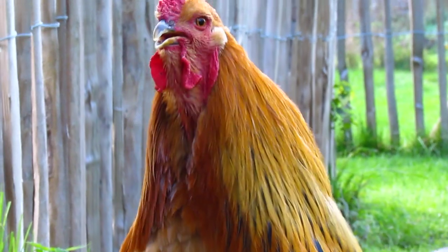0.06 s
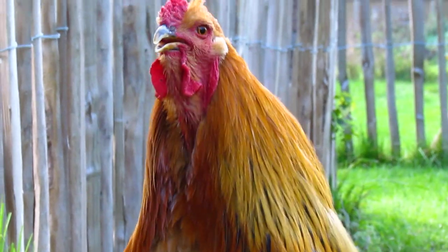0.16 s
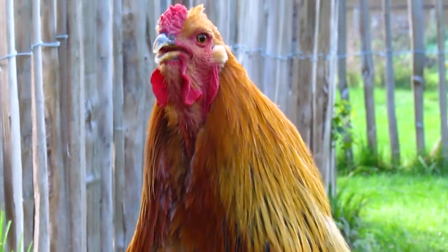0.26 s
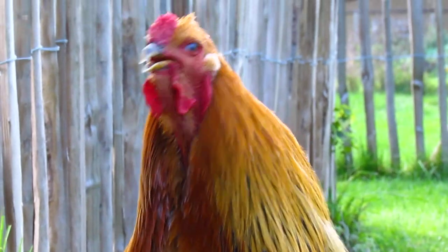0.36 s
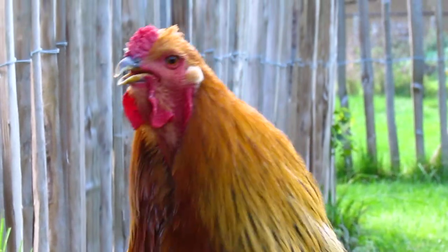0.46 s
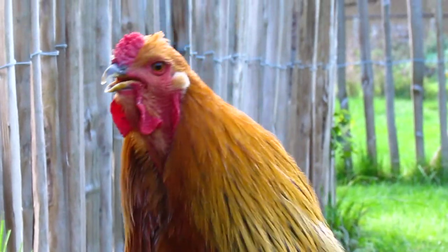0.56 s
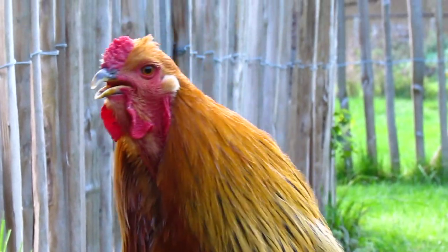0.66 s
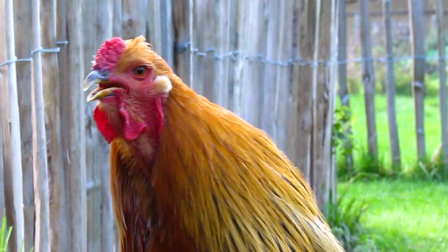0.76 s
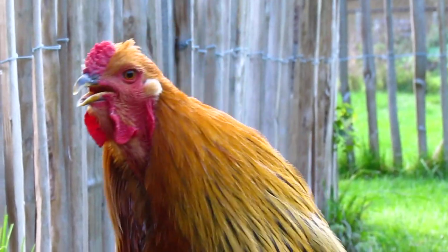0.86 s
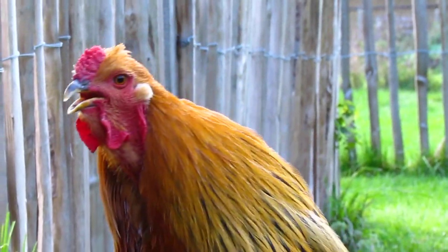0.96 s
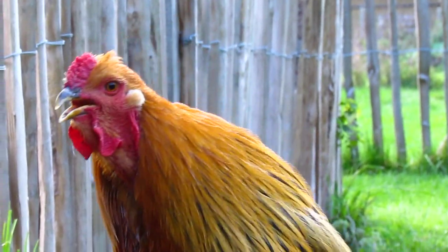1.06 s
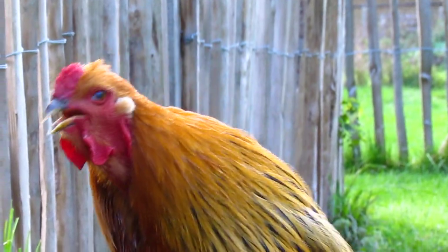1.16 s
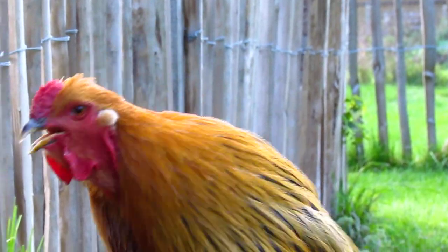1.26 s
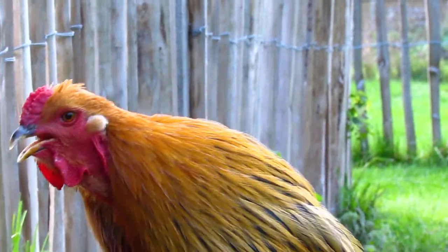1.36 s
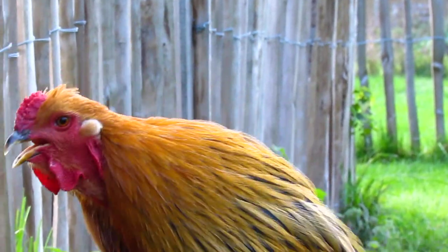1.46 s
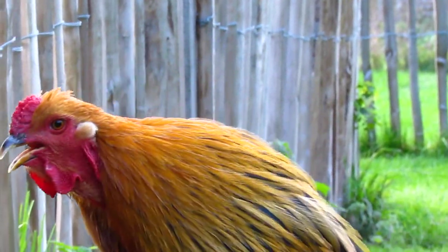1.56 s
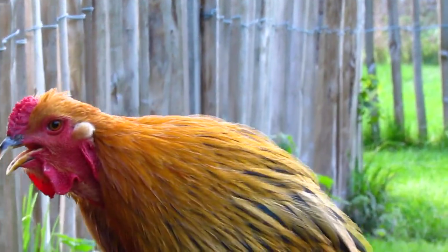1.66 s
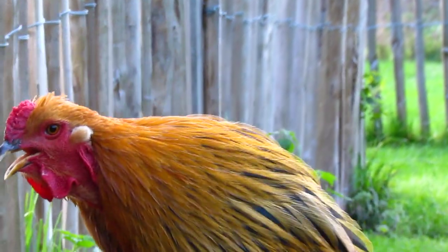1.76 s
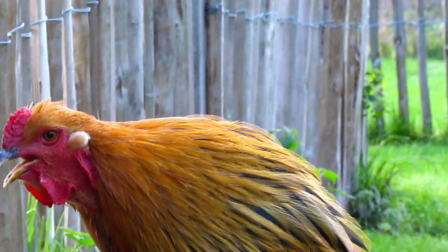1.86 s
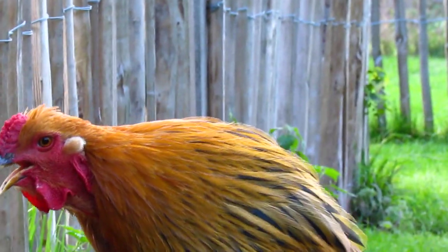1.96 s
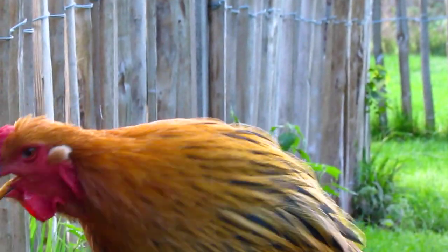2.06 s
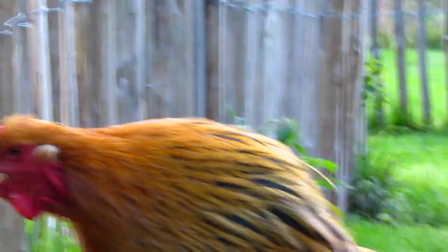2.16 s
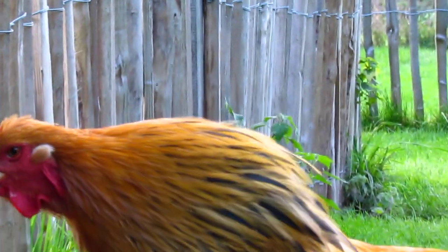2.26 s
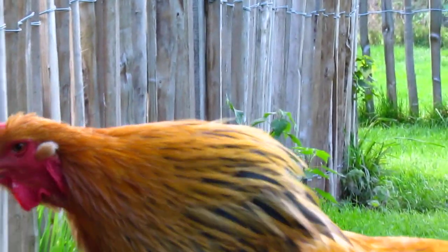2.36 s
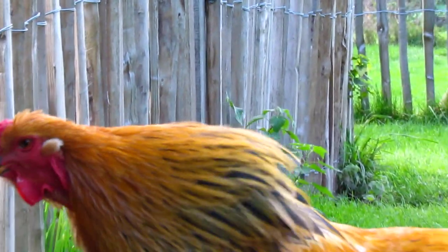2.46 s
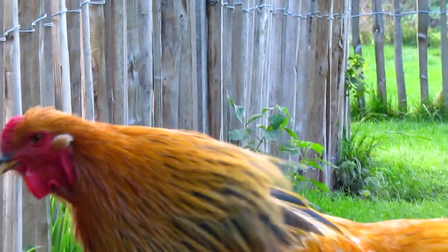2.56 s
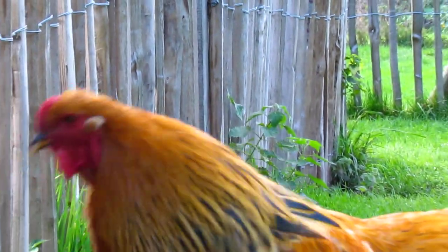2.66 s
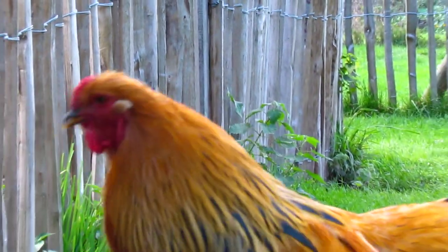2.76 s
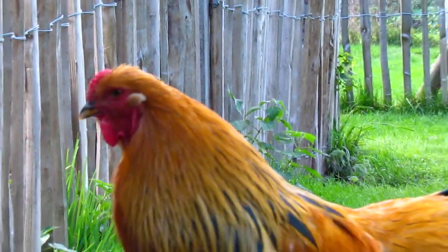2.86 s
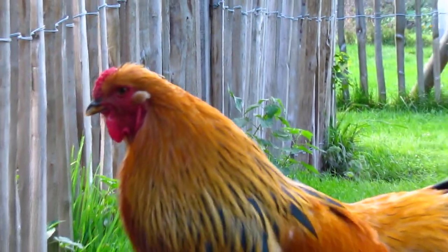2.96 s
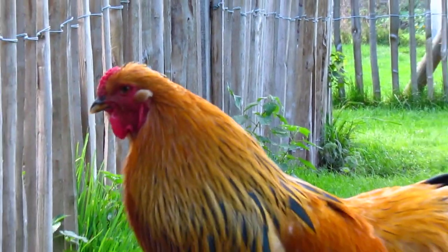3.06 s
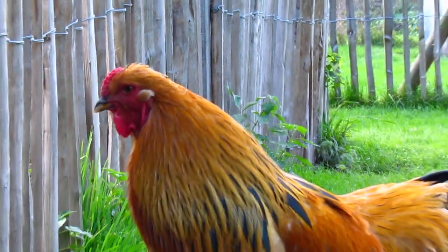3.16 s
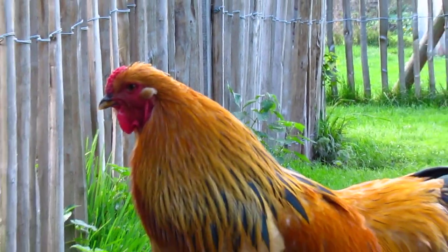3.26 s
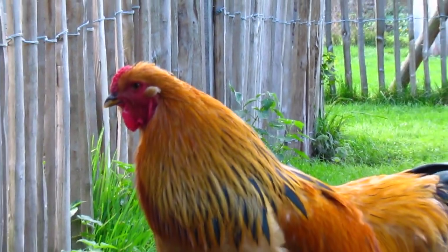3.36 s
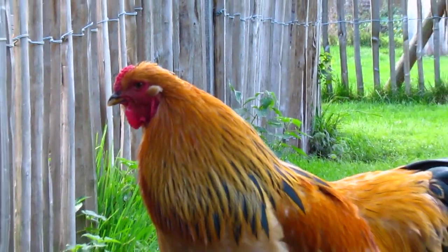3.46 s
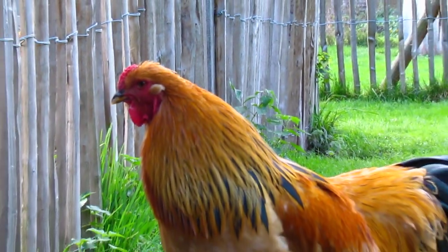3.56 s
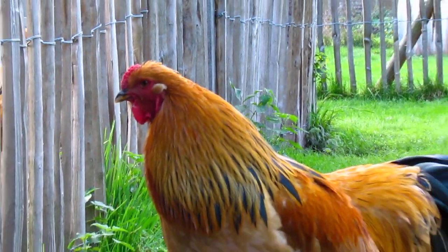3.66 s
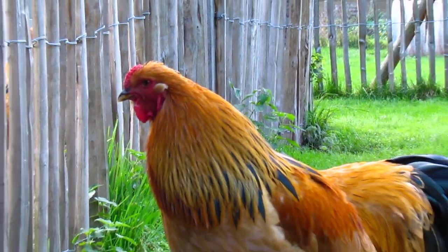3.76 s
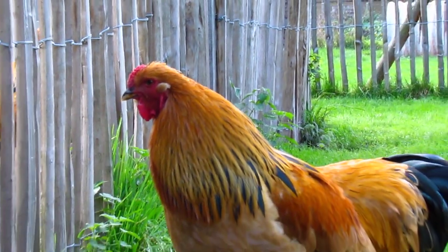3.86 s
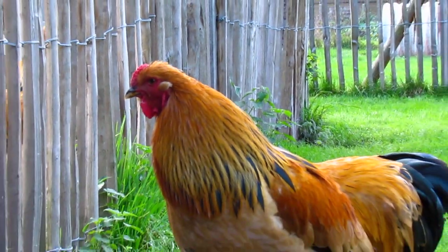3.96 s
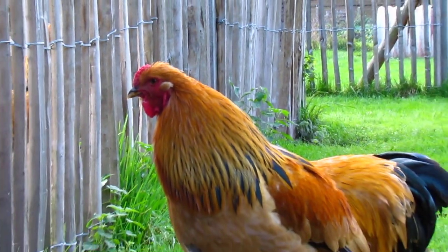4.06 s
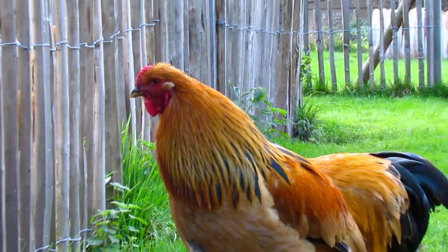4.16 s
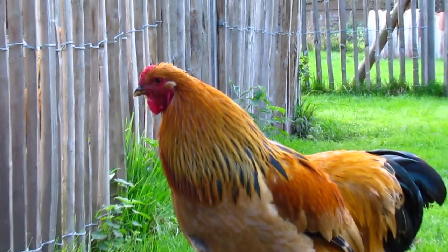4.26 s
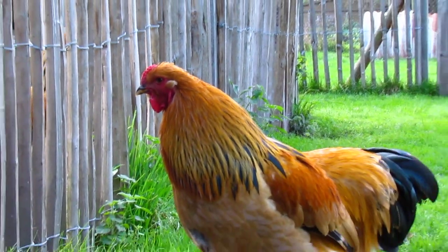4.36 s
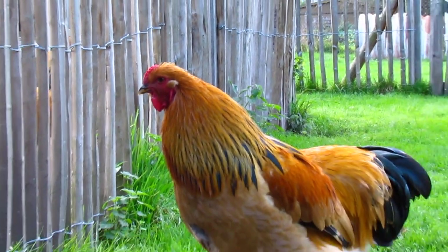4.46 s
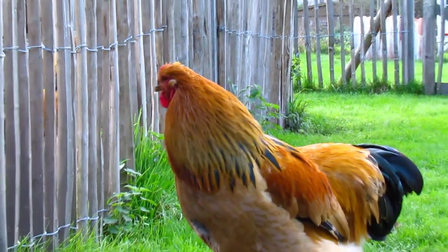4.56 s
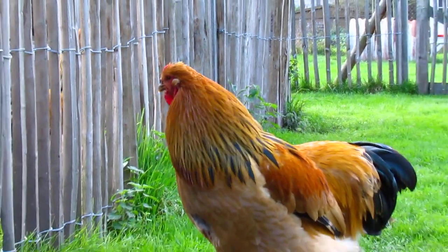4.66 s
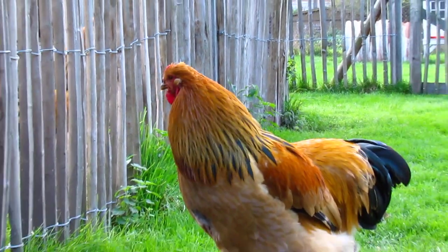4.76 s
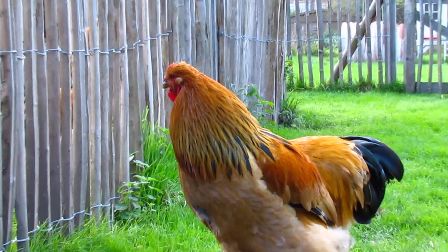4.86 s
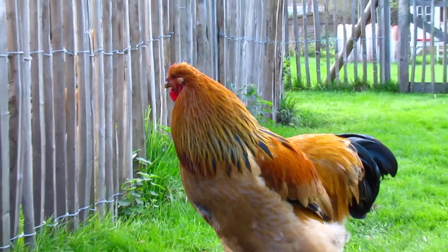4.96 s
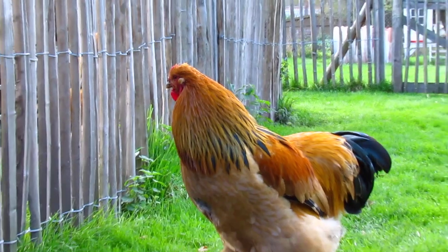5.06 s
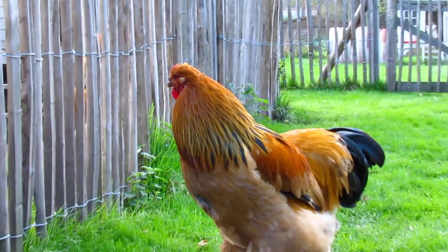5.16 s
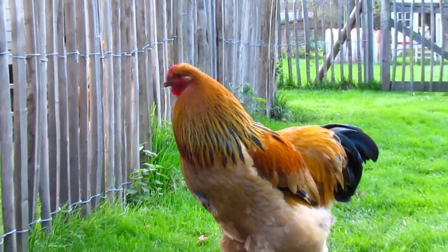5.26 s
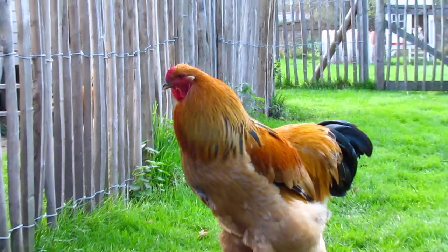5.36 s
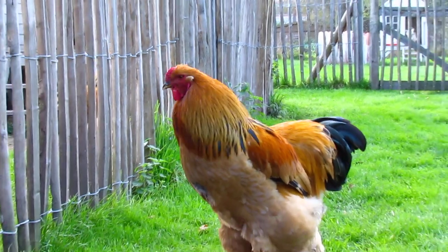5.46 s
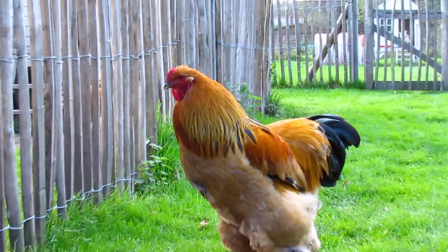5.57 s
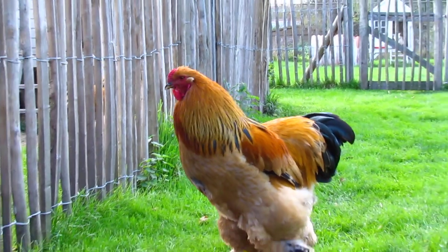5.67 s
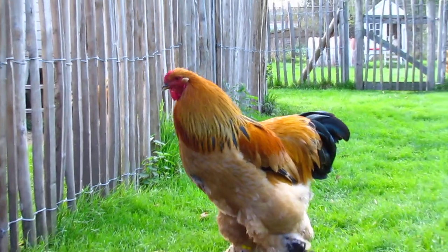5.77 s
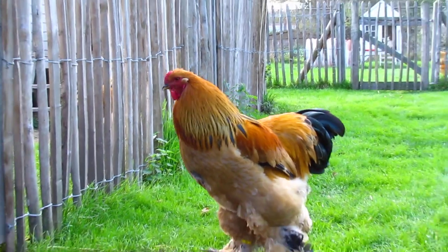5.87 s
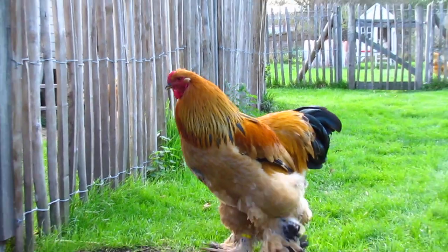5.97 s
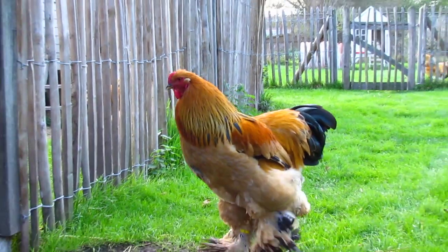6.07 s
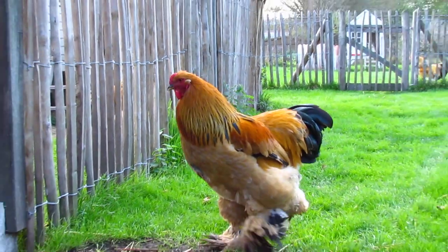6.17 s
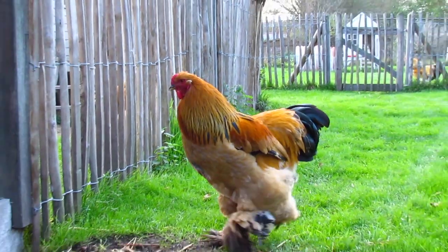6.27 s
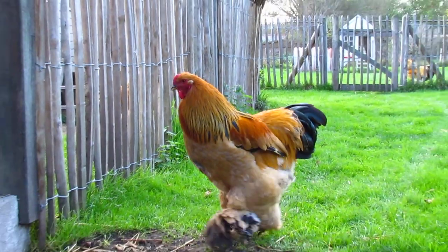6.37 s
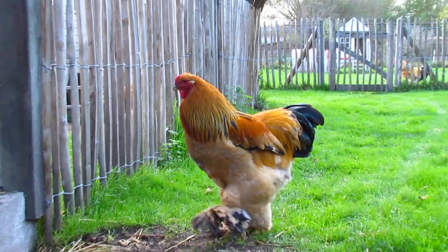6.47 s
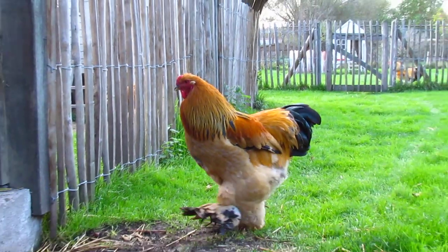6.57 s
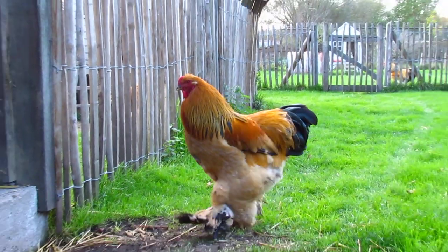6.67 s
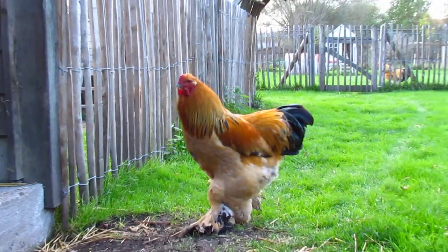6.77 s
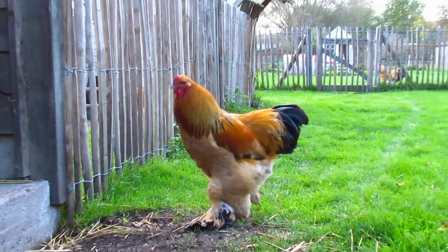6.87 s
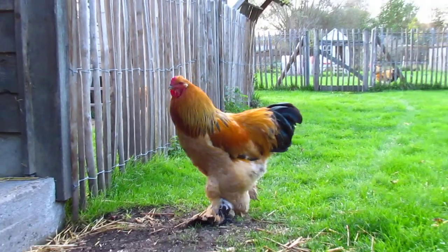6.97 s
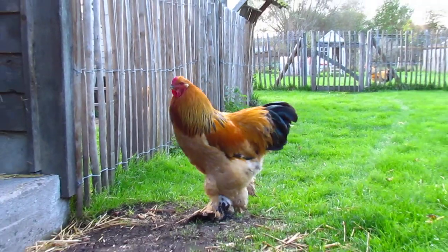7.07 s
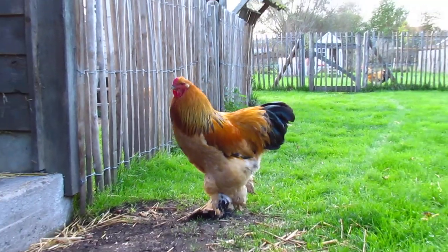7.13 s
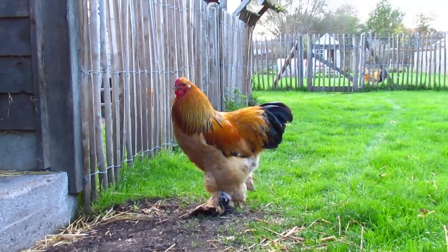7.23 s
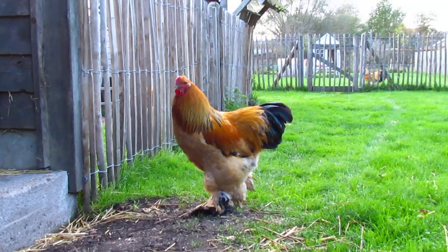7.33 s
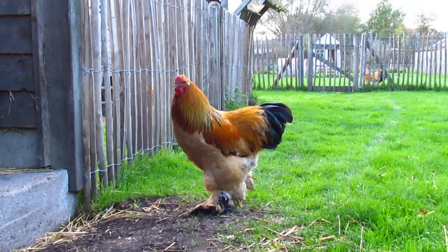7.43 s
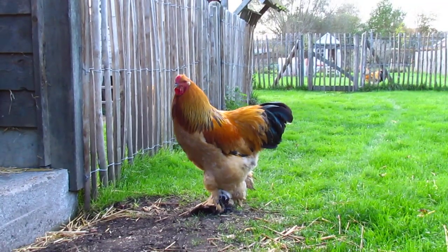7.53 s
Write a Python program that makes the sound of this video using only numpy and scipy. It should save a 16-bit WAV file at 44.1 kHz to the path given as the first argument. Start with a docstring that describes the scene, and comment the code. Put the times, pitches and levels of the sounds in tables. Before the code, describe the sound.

A rooster close by crows twice in a fenced garden, raspy and loud, with a quiet pause between and a soft distant wash behind.

```python
"""In a garden with a wooden fence, a rooster crows twice, close by. Sharp pulses from his syrinx (the bird's
voice box) ring the throat, jump between a low and a high register and rasp at the breaks. The first crow
doubles its period on the long note; in the second, the two sides of the syrinx sing different pitches and
a thin squeak slips in. Ground and fence send early echoes and the garden adds a short tail.
Behind him, filtered noise makes a distant wash and a low drone; two faint noise ticks come near the end."""
import sys
import numpy as np
from scipy import signal
from scipy.fft import rfft, irfft, next_fast_len
from scipy.io import wavfile
from scipy.ndimage import uniform_filter1d, map_coordinates

SR = 44100
rng = np.random.default_rng(int(sys.argv[2]) if len(sys.argv) > 2 else 0)


def inscribe(sig):
    """Save sig as 16-bit PCM at rate SR to the path in sys.argv[1].

    A 1-D sig is mono; a 2-D sig holds one channel per row.
    Samples are clipped to [-1, 1] before scaling.
    """
    pcm = np.round(np.clip(np.atleast_2d(sig).T, -1, 1) * 32767)
    wavfile.write(sys.argv[1], SR, pcm.astype(np.int16))


N = 335160  # length in samples
TOP_HZ = 15800  # the sound ends at this frequency


def amp(db):
    """Turn decibels into gain."""
    return 10 ** (np.asarray(db) / 20)


def unit(x):
    """Scale to an rms level of 1."""
    return x / np.sqrt(np.mean(x ** 2) + 1e-20)


def seconds():
    """The time of every sample."""
    return np.arange(N) / SR


def along(points, hz):
    """Read a value at each frequency from (Hz, value) points, on a log frequency axis."""
    point_hz, value = np.transpose(points)
    return np.interp(np.log(hz + 1), np.log(point_hz + 1), value)


def curves(rows):
    """Draw each column after the time as a curve with one value per sample."""
    times, *columns = np.transpose(rows)
    return [np.interp(seconds(), times, column) for column in columns]


def wobble(rate):
    """A smooth random curve with this many random points per second."""
    points = rng.standard_normal(int(N * rate / SR) + 4)
    return map_coordinates(points, [np.arange(N) * rate / SR])


def filtered(x, response):
    """Multiply the spectrum of x by a response that depends on frequency."""
    m = next_fast_len(N + SR // 4, True)  # padded, so that the end does not wrap onto the start
    return irfft(rfft(x, m) * response(np.fft.rfftfreq(m, 1 / SR)), m)[..., :N]


def sounding(rows, fade=.008):
    """1 from the first row to the last, with soft ends; fade in seconds."""
    t = seconds()
    return np.clip(np.minimum(t - rows[0][0], rows[-1][0] - t) / fade + .5, 0, 1)


# How alike the noise is at the two ears: pitch_hz, likeness (0-1)
EAR_LIKENESS = [(60, 0.99), (180, 0.98), (550, 0.91), (1650, 0.28), (4970, 0.051), (15000, 0.02)]


def rush(spectrum):
    """Stereo noise of rms 1: a shared middle part plus a side part that sets the ears apart."""
    def middle_and_side(hz):
        turn = np.arccos(np.clip(along(EAR_LIKENESS, hz), -1, 1)) / 2
        return amp(along(spectrum, hz)) * [np.cos(turn), np.sin(turn)]

    middle, side = filtered(rng.standard_normal((2, N)), middle_and_side)
    return unit(np.array([middle + side, middle - side]))


# Loudness of the background over time, before trim and waver: time_s, wash_db, drone_db
BACKGROUND_LEVELS = [(0, -49.5, -47), (.5, -44.5, -52), (1.1, -48, -63), (1.7, -40, -51),
                     (2.6, -40.5, -50.5), (4.3, -32.5, -45.5), (6.8, -32, -47.5), (7.15, -31.5, -41),
                     (7.6, -33, -42)]
# Tone colour of the distant wash: pitch_hz, relative_level_db
WASH_COLOUR = [(24, -24), (40, -13), (64, -5), (91, -10.5), (294, -9.5), (350, -14.5), (653, -9),
               (1020, -2), (1280, -3), (2160, -7), (2920, -12.5), (4460, -24), (9410, -31.5), (11200, -32),
               (15500, -49)]
# Tone colour of the low drone: pitch_hz, relative_level_db
DRONE_COLOUR = [(25, -42), (33, -34), (38, -5), (44, -7), (51, -10), (61, 14), (67, 6), (75, -27),
                (200, -85)]


def background(wash_db=0, drone_db=-4.0, waver_db=0.54):
    """Two noises, a wavering wash and a low drone, both louder after the first crow."""
    wash, drone = curves(BACKGROUND_LEVELS)
    wash_noise = amp(wash + wash_db + waver_db * wobble(8)) * rush(WASH_COLOUR)
    return wash_noise + amp(drone + drone_db) * rush(DRONE_COLOUR)


# Colour of each note of both crows: start_s (middle of the glide into it), glide_s, roughness (0-1),
# fundamental_db, nasal_db, bright_db, edge_db, fade_db_per_s (for nasal and bright)
NOTE_COLOURS = [(0, 0.0098, 0.77, -39.5, -30, -42, -38.5, 2),
                (.055, .03, .11, -30.5, -33.5, -32.5, -26.5, -3),
                (0.356, .04, 0.05, -31, -33.5, -36.5, -35, -29),
                (.635, 0.047, 0.05, -33, -39, -32, -27.5, 0.5),
                (1.44, 0.17, 0.05, -26.5, -37, -34.5, -34, 5),
                (1.685, .012, 0.05, -22.5, -38.5, -31.5, -25, 2), (2.1, 0.041, .85, -36, -44, -42, -42, 36),
                (4.4, .01, .4, -26, -34.5, -42.5, -39, -7), (4.69, 0.083, .6, -36.5, -37, -45, -47.5, 20),
                (4.775, 0.0032, 0.89, -29, -27.5, -38, -38, -40),
                (4.803, 0.015, 0.06, -31, -23.5, -34, -29.5, -25),
                (4.895, .03, 0.82, -32.5, -28, -40, -41, -25), (5.02, 0.055, .08, -35, -28, -36.5, -35, 18),
                (5.32, 0.19, .06, -34.5, -37.5, -43, -34.5, 12.5),
                (6.36, 0.22, 0.08, -27.5, -34, -27, -33.5, -11),
                (6.86, .04, 0.2, -22, -29, -37.5, -39, 200)]


def note_shares():
    """The share of each note in every sample; each note glides into the next."""
    t = seconds()
    begun = [np.ones(N)]
    for start, glide, *_ in NOTE_COLOURS[1:]:
        begun.append(np.clip((t - start) / glide + .5, 0, 1))
    return -np.diff(np.array(begun), axis=0, append=0)


# Brief rasps as the syrinx slips or changes register: time_s, half_width_s, added_roughness (0-1),
# ring_dip_db (negative lifts the ring)
REGISTER_BREAKS = [(0.061, 0.024, 0.5, -1), (.158, 0.0075, 0.02, 10), (.226, 0.0177, 0.64, 5),
                   (.35, 0.0143, 0.61, 4.5), (.392, 0.0217, 0.58, -0.5), (.65, .018, 0.78, 4.5),
                   (1.689, .014, 0.46, 2), (1.801, 0.013, 0.07, 4.5), (4.64, .03, .22, 0),
                   (5.032, 0.0071, 0.29, 4), (5.071, 0.015, 0.56, 11)]


def rasp():
    """Roughness of the notes and their breaks, and the dip of the throat ring in dB at each break."""
    t = seconds()
    rough = np.transpose(NOTE_COLOURS)[2] @ note_shares()
    dip_db = np.zeros(N)
    for time, width, roughness, db in REGISTER_BREAKS:
        bump = np.exp(-np.minimum(((t - time) / width) ** 2, 20))
        rough = rough + roughness * bump
        dip_db = dip_db + db * bump
    return np.clip(rough, 0, 1), dip_db


# Alternating strong and weak cycles; the end values hold outside these times: time_s, depth (0-1)
PERIOD_DOUBLING = [(.75, 0.1), (.78, 0.84), (1.2, 1), (1.34, 0.65), (1.41, 0.05)]


def syrinx(pitch, rough, jitter=.075, flutter=0.00056, shimmer=0.39, swing=0.11, alternate=0.41,
           hiss=0.52, clean_hiss=0.0064):
    """One sharp pulse per cycle; roughness scatters their times and sizes and lets air through."""
    doubling, = curves(PERIOD_DOUBLING)
    rate = pitch * (1 + jitter * rough * wobble(520) + flutter * wobble(70))
    phase = 2 * np.pi * np.cumsum(rate) / SR
    # with a doubled period every other pulse comes early and strong
    every_other = doubling * np.cos(phase / 2)
    beat = (phase + swing * every_other + np.pi) % (2 * np.pi) - np.pi
    offset_s = beat / (2 * np.pi * pitch)
    pulses = unit(np.sinc(2 * TOP_HZ * offset_s) * np.cos(beat / 2) ** 2)
    size = (1 + alternate * every_other) * np.exp(shimmer * rough * wobble(400))
    # more air leaks once the vibration breaks up
    leak = clean_hiss + hiss * rough * np.sqrt(rough)
    air = leak * rng.standard_normal(N) * (1 + np.cos(phase))
    return pulses * size + air


def resonances(peaks, hz, valley_db=-19):
    """Gain of a set of rounded peaks over a dark valley that sinks in the treble."""
    gain = amp(valley_db) / (1 + (hz / 9000) ** 6)
    for centre, width, db in peaks:
        gain = gain + amp(db) / (1 + ((hz - centre) / (1.29 * width)) ** 2) ** 2
    return gain


# The main throat resonance follows the opening of the beak: time_s, pitch_hz
THROAT_RING = [(.03, 1100), (.1, 1220), (.35, 1240), (.41, 1062), (.65, 1220), (.8, 1200), (1.4, 1175),
               (1.7, 1220), (1.82, 1321), (2.2, 1345), (2.36, 1177), (4.6, 1168), (4.8, 1390), (6.9, 1220)]


def throat(x, rough, early, late, turn_s, ring_db=19, ring_width_hz=260, rough_widening=0.72, chest_db=3,
           sway_db=4.5, glide=0.27, dispersion=0.0024):
    """Colour the pulses: a moving main resonance, and upper ones that change with the posture."""
    hz, t, spectrum = signal.stft(x, SR, nperseg=768, noverlap=576)
    hz = hz[:, None]
    moved = np.clip((t - turn_s) / glide + .5, 0, 1)
    upper = (1 - moved) * resonances(early, hz) + moved * resonances(late, hz)
    # as the head sways, neighbouring overtones wax and wane apart from the rest
    sway = uniform_filter1d(rng.standard_normal(spectrum.shape), size=10, axis=0)
    sway = unit(uniform_filter1d(sway, size=36, axis=1))
    # a leaky, rasping syrinx damps the main resonance
    width = ring_width_hz * (1 + rough_widening * np.interp(t, seconds(), rough))
    ring_hz = np.interp(t, *np.transpose(THROAT_RING))
    ring = amp(ring_db) / (1 + ((hz - ring_hz) / width) ** 2) ** 2
    chest = amp(chest_db) / (1 + ((hz - 540) / 160) ** 4)
    gain = upper * amp(sway_db * sway) + ring + chest
    voice = signal.istft(spectrum * gain, SR, nperseg=768, noverlap=576)[1][:N]
    # the resonances delay each frequency differently, which smears the pulses
    return filtered(voice, lambda f: np.exp(-1j * np.pi * dispersion * f ** 2 / TOP_HZ))


def within_note(x, shares, on):
    """How far x lies from its mean over the sounding part of each note."""
    note_means = shares @ (x * on) / (shares @ on + 1e-9)
    return x - note_means @ shares


# Within a note, gain per dB of effort: one number each for fundamental, nasal, bright, edge (db_per_db)
EFFORT_SHARES = [0.29, 0.033, 0.3, 0.089]
# Tension brightens the voice: one number each for nasal, bright, edge (db_per_semitone)
TENSION_SHARES = [.2, 0.99, 1.1]
CHEST_HZ, CHEST_DB_PER_SEMITONE = 500.4, 4.5  # the fundamental weakens away from this pitch
CHEST_REACH = 2.4  # semitones below that pitch where the weakening levels off
EDGE_FADE_SHARE = .45  # the edge fades more slowly than the nasal and bright regions
WANDER_DB, WANDER_RATE = 0.88, 22  # random drift of each region but the ring; points per second


def region_levels(pitch, effort_db, on):
    """Levels of the five regions in dB: the note's colour, bent by effort, pitch and the note's age."""
    shares = note_shares()
    *_, base, nasal, bright, edge, fade = np.transpose(NOTE_COLOURS) @ shares
    semitones = 12 * np.log2(pitch / CHEST_HZ)
    push = within_note(effort_db, shares, on)
    tension = within_note(semitones, shares, on)
    off_chest = within_note(np.abs(np.maximum(semitones, -CHEST_REACH)), shares, on)
    age = within_note(seconds(), shares, on)
    upper = np.array([nasal - fade * age, bright - fade * age, edge - EDGE_FADE_SHARE * fade * age])
    upper = upper + np.outer(TENSION_SHARES, tension)
    levels = np.vstack([base - CHEST_DB_PER_SEMITONE * off_chest, upper])
    levels = levels + np.outer(EFFORT_SHARES, push)
    base, nasal, bright, edge = (np.minimum(db, 0) + WANDER_DB * wobble(WANDER_RATE) for db in levels)
    return base, effort_db, nasal, bright, edge


def formant(x, lo, hi):
    """One frequency region of the voice, held near rms 1."""
    band = filtered(x, lambda hz: 1 / (1 + (lo / (hz + 1)) ** 24) / (1 + (hz / hi) ** 24))
    power = uniform_filter1d(uniform_filter1d(band ** 2, size=700), size=700)
    return band / np.sqrt(np.abs(power) + 1e-12)


# Borders of the five voice regions (fundamental, throat ring, nasal, bright, edge): border_hz
REGION_BORDERS = [330, 790, 1590, 2850, 5500, 16000]


def crow(notes, early, late, turn_s, ring_trim_db, croak_db=2.7, fade_s=.014):
    """The pulses ring the throat; each region swells as neck and beak move."""
    rows = np.vstack(notes)
    pitch, effort_db = curves(rows)
    rough, dip_db = rasp()
    on = sounding(rows, fade_s)
    voice = throat(syrinx(pitch, rough), rough, early, late, turn_s)
    levels = region_levels(pitch, effort_db + ring_trim_db - dip_db, on)
    total = 0
    for db, lo, hi in zip(levels, REGION_BORDERS, REGION_BORDERS[1:]):
        # a rasp shakes each region unevenly
        total = total + amp(db + croak_db * rough * wobble(120)) * formant(voice, lo, hi)
    return on * total


# Notes of the first crow, in order; effort is the level of the throat ring before trim and dips:
# time_s, pitch_hz, effort_db
CROAK_NOTE = [(0, 473.6, -26), (.03, 490.7, -28.5), (.05, 564.1, -24.5)]
OPENING_NOTE = [(0.065, 639.0, -21), (0.087, 663.0, -12.5), (0.143, 669.7, -14), (0.167, 661.9, -13),
                (0.319, 651.1, -13.5), (0.353, 619.8, -18.5), (0.38, 575.6, -20.5)]
DIP_NOTE = [(0.4, 471, -26.5), (0.46, 467.8, -24.5), (0.556, 479.8, -21.5), (0.596, 488, -42),
            (0.61, 501.6, -17.5), (0.625, 511, -16.5)]
HOLD_NOTE = [(0.645, 606.5, -11.5), (0.705, 624.4, -12), (0.805, 608.6, -12.5), (0.905, 620.6, -15),
             (1.141, 617, -14), (1.191, 631.2, -17), (1.273, 616.3, -14), (1.447, 622.6, -15),
             (1.517, 605.7, -15.5), (1.655, 593, -13), (1.678, 585, -17)]
FALL_NOTE = [(1.692, 499.2, -18), (1.746, 508, -21), (1.812, 472, -13.5), (1.922, 461, -14),
             (1.972, 456.2, -22.5), (2.014, 442, -18.5), (2.09, 424.5, -21.5)]
RATTLE_NOTE = [(2.12, 436.7, -26), (2.19, 415, -26.5), (2.28, 436, -29.5), (2.315, 490, -36),
               (2.36, 439.5, -33), (2.394, 415, -46)]
# Upper resonances of throat and beak with the neck up, then stretched out:
# centre_hz, width_hz (relative), level_db
NECK_UP_PEAKS = [(1785, 160, 9), (2460, 82, 6), (3550, 180, -2), (4400, 190, 12.5), (5290, 84, 13.5),
                 (6406, 110, 5), (7370, 84, 5), (8800, 340, -4), (9750, 280, -5), (10650, 300, -6),
                 (11640, 210, -8), (14500, 800, -24)]
NECK_OUT_PEAKS = [(1730, 71, 8.5), (2427, 150, -1), (2886, 58, -18.5), (3410, 160, -6), (4350, 310, -4),
                  (5890, 230, 0.5), (6790, 155, 6), (7500, 420, 4.5), (9350, 380, 5.5), (10300, 166, 8),
                  (10860, 340, 5), (11960, 500, -4), (14350, 680, -13.5)]


def first_crow():
    """He starts in a croak, stretches the neck before the long high note, then falls into a rattle."""
    notes = [CROAK_NOTE, OPENING_NOTE, DIP_NOTE, HOLD_NOTE, FALL_NOTE, RATTLE_NOTE]
    return crow(notes, NECK_UP_PEAKS, NECK_OUT_PEAKS, turn_s=0.49, ring_trim_db=0.2)


# Early echoes from ground and palings: left_delay_s, right_delay_s, relative_level_db
EARLY_ECHOES = [(.0013, .0015, -29), (.0024, 0.0022, -9.5), (.0046, .0039, -15), (.0063, 0.0048, -20.5),
                (.0097, 0.0089, -24), (0.0146, 0.01, 0.5)]
# Share of the sound that they reflect: pitch_hz, level_db
FENCE_COLOUR = [(300, -55), (1450, -19), (2300, -5.5), (6000, -6.5), (13000, -9.5)]


def fence(x):
    """Ground and palings send a few early copies to each ear, mostly treble."""
    def echoes(hz):
        copies = 0
        for left, right, db in EARLY_ECHOES:
            copies = copies + amp(db) * np.exp(-2j * np.pi * np.outer([left, right], hz))
        return amp(along(FENCE_COLOUR, hz)) * copies

    return filtered(x, echoes)


# How long the tail takes to fall by 60 dB: pitch_hz, decay_s
GARDEN_DECAY = [(300, 0.58), (1500, 0.52), (5000, 0.085), (12000, 0.018)]
# Loudness of the tail: pitch_hz, level_db
TAIL_COLOUR = [(400, -27), (1300, -19.5), (2500, -9.5), (10000, -2.5)]


def garden(x):
    """A short, thin outdoor tail: x is smeared by noise whose treble dies first."""
    hz, t, spectrum = signal.stft(rng.standard_normal((2, SR // 2)), SR, nperseg=256)
    decay = amp(-60 * t / along(GARDEN_DECAY, hz)[:, None])
    tail = signal.istft(spectrum * decay, SR, nperseg=256)[1]
    smeared = signal.fftconvolve(x[None], tail / np.linalg.norm(tail[0]), axes=1)[:, :N]
    return filtered(smeared, lambda f: amp(along(TAIL_COLOUR, f)))


# Notes of the second crow, in order; effort is the level of the throat ring before trim and dips:
# time_s, pitch_hz, effort_db
GROWL_NOTE = [(4.47, 464.3, -28.5), (4.545, 570, -24), (4.575, 501.4, -33), (4.62, 564.3, -17.5),
              (4.66, 485.6, -28), (4.768, 520.3, -40)]
LEAP_NOTE = [(4.778, 565, -30), (4.796, 611.5, -20.5), (4.812, 664.2, -9.5), (4.856, 676.8, -10),
             (4.89, 643.4, -20.5), (4.93, 648, -46), (4.98, 620, -29)]
LONG_NOTE = [(5.02, 683, -10.5), (5.072, 682.6, -7), (5.116, 677, -8.5), (5.216, 662, -18),
             (5.268, 628.5, -19.5), (5.472, 650.4, -18), (5.796, 645.6, -10), (6.124, 657.4, -13),
             (6.274, 650.7, -12.5), (6.3, 649.4, -15.5)]
CLOSE_NOTE = [(6.37, 639.7, -22), (6.44, 639.7, -29), (6.52, 636, -23.5), (6.64, 621, -24),
              (6.769, 603.9, -26), (6.866, 567, -27.5), (6.91, 502, -51), (6.926, 445, -40),
              (6.94, 385, -41)]
# Upper resonances of throat and beak with the beak wide, then closing:
# centre_hz, width_hz (relative), level_db
BEAK_WIDE_PEAKS = [(890, 18, 41), (1890, 208, -11), (2340, 93, 3), (3290, 116, -11), (3890, 130, -9.5),
                   (5300, 140, -23), (5885, 84, -5), (6790, 470, -2.5), (7240, 78, 11), (8120, 157, 3),
                   (8620, 480, -7), (10090, 350, -2), (11310, 240, -6.5), (13200, 190, -11.5)]
BEAK_CLOSING_PEAKS = [(2305, 327, 23), (3060, 193, 17), (4920, 112, 4.5), (6010, 420, -8),
                      (7434, 860, -3.5), (8830, 870, -6), (9990, 220, 5.5), (11060, 600, -10),
                      (12890, 800, -19)]


def second_crow():
    """He growls, leaps up to a long note, starts to close the beak as it ends, and drops in pitch last."""
    notes = [GROWL_NOTE, LEAP_NOTE, LONG_NOTE, CLOSE_NOTE]
    return crow(notes, BEAK_WIDE_PEAKS, BEAK_CLOSING_PEAKS, turn_s=6.3, ring_trim_db=-1.6)


# A thin whistle in the growl: time_s, pitch_hz, relative_level_db
SQUEAK_CONTOUR = [(4.61, 2400, -12), (4.66, 2524, -18), (4.685, 2424, -2), (4.725, 2510, 2),
                  (4.76, 2580, -27)]


def squeak(level_db=-31, scatter=.02):
    """A thin whistle rises out of the growl: one sine with an unsteady pitch."""
    pitch, db = curves(SQUEAK_CONTOUR)
    phase = 2 * np.pi * np.cumsum(pitch * (1 + scatter * wobble(300))) / SR
    return amp(level_db + db) * sounding(SQUEAK_CONTOUR) * np.sqrt(2) * np.sin(phase)


# The other side of the syrinx: time_s, pitch_hz, level_db (of its fundamental)
SECOND_CONTOUR = [(4.87, 549, -25), (4.888, 577.4, -26), (4.956, 591, -20.5), (5.06, 530, -39.5),
                  (5.104, 591, -25.5), (5.214, 573.6, -32.5), (5.406, 558.4, -24), (6.186, 555.6, -23.5),
                  (6.312, 546.4, -23.5), (6.546, 497.1, -32.5), (6.59, 515.4, -29)]
# Its overtones: multiple of the pitch, relative_level_db
SECOND_OVERTONES = [(2, -5.5), (3, 2), (4, -25), (5, -19), (6, -18), (8, -18.5), (9, -21), (11, -13),
                    (13, -7.5), (15, -31), (16, -34), (18, -34), (20, -32)]


def second_voice(jitter=.014, flutter=0.00125, level_db=0, overtone_db=-6, dulling_db_per_s=6):
    """The other side of the syrinx sings lower and beats with the first; its overtones fade with time."""
    pitch, db = curves(SECOND_CONTOUR)
    rough, _ = rasp()
    age = np.maximum(seconds() - SECOND_CONTOUR[0][0], 0)
    rate = pitch * (1 + jitter * rough * wobble(450) + flutter * wobble(200))
    phase = 2 * np.pi * np.cumsum(rate) / SR
    overtones = sum(amp(level) * np.sin(round(k) * phase) for k, level in SECOND_OVERTONES)
    tone = np.sin(phase) + amp(overtone_db - dulling_db_per_s * age) * overtones
    return np.sqrt(2) * sounding(SECOND_CONTOUR, fade=0.0071) * amp(db + level_db) * tone


# Two faint ticks: start_s, relative_level_db
TICK_TIMES = [(7.252, -23), (7.442, -26)]


def ticks(t60=.014, level_db=-3, low_hz=3000, high_hz=10000):
    """Two tiny dry ticks: bursts of noise that fall by 60 dB in t60 seconds."""
    t = seconds()
    bursts = 0
    for start, db in TICK_TIMES:
        bursts = bursts + amp(db + level_db - 60 * np.abs(t - start) / t60) * (t >= start)

    def colour(hz):
        return hz ** 2 / (hz ** 2 + low_hz ** 2) / (1 + (hz / high_hz) ** 4)

    return filtered(bursts * rng.standard_normal((2, N)), colour)


def placed(x, pan):
    """Lean a voice to the left by (Hz, dB) points; negative dB leans it to the right."""
    return filtered(x, lambda hz: amp(np.outer([.5, -.5], along(pan, hz))))


def scene():
    """The rooster before the fence, in the open garden."""
    first = first_crow()
    second = second_crow() + squeak() + second_voice()
    first_pan = [(500, 2.0), (1300, 1.2), (2300, -1), (4500, 4.5), (10000, 2.0)]
    second_pan = [(500, -1.0), (1300, 0.5), (2500, -3.0), (7000, 3)]
    direct = placed(first, first_pan) + placed(second, second_pan)
    rooster = first + second
    return background() + direct + fence(rooster) + garden(rooster) + ticks()


def record(dry):
    """Keep nothing above the top frequency."""
    return filtered(dry, lambda hz: hz < TOP_HZ)


dry = scene()
out = record(dry)
inscribe(out)
```